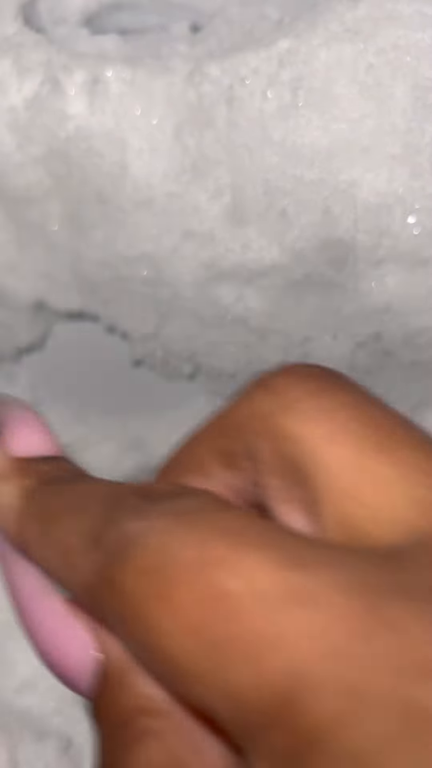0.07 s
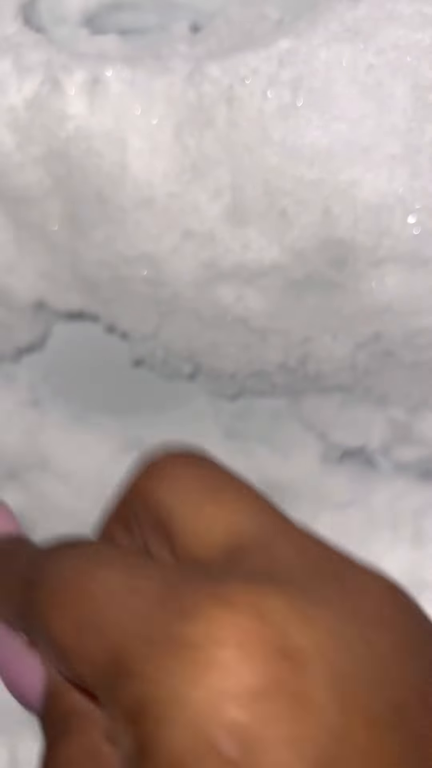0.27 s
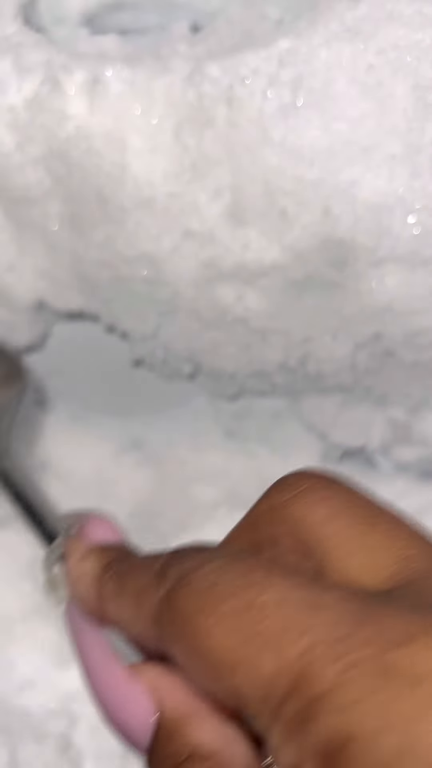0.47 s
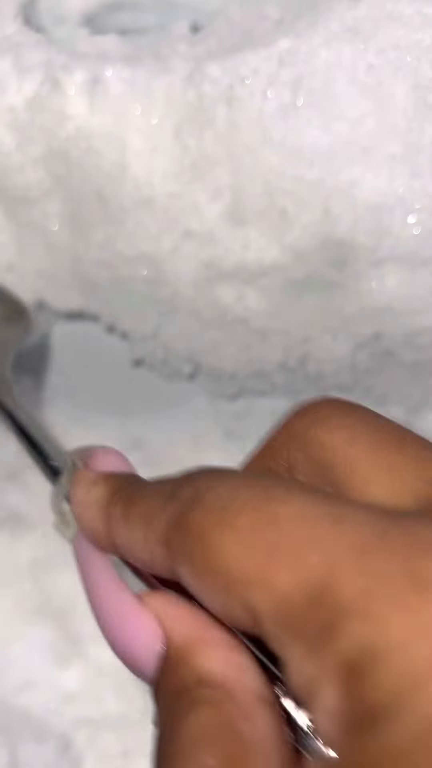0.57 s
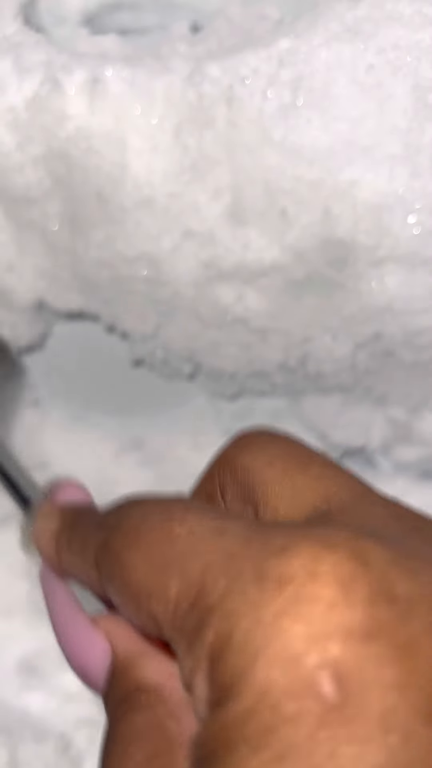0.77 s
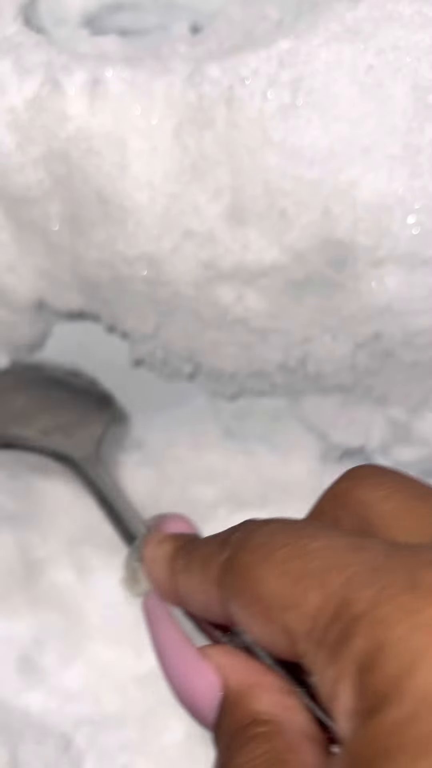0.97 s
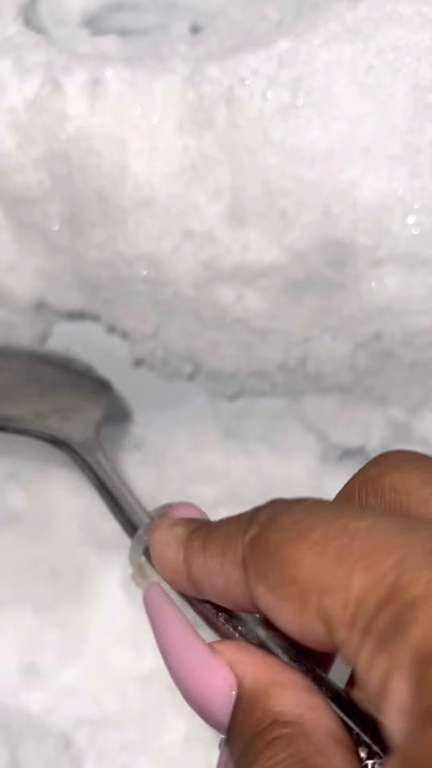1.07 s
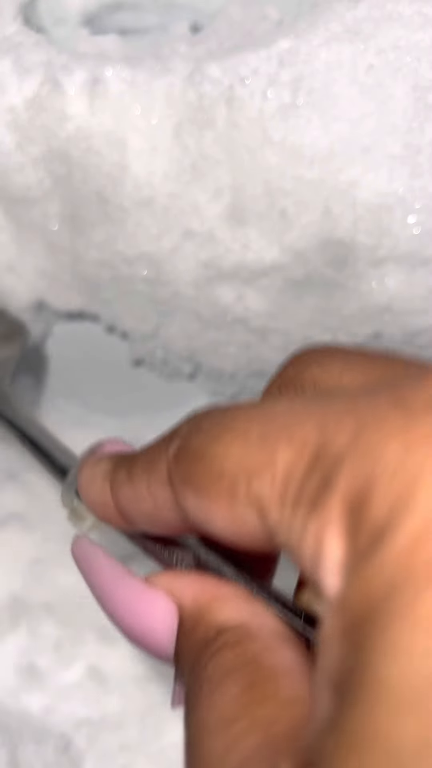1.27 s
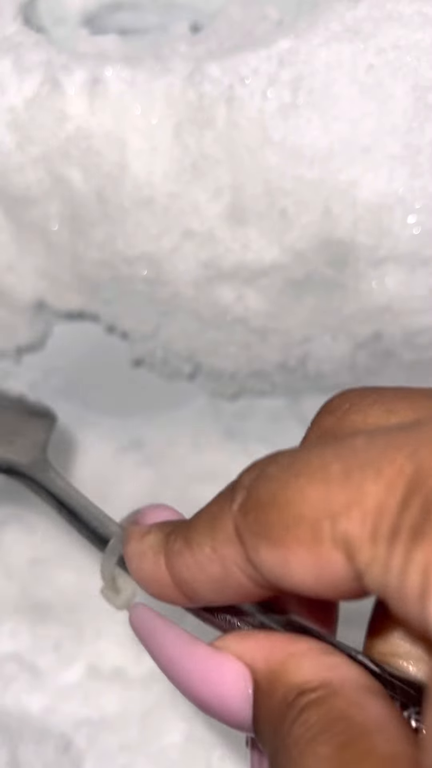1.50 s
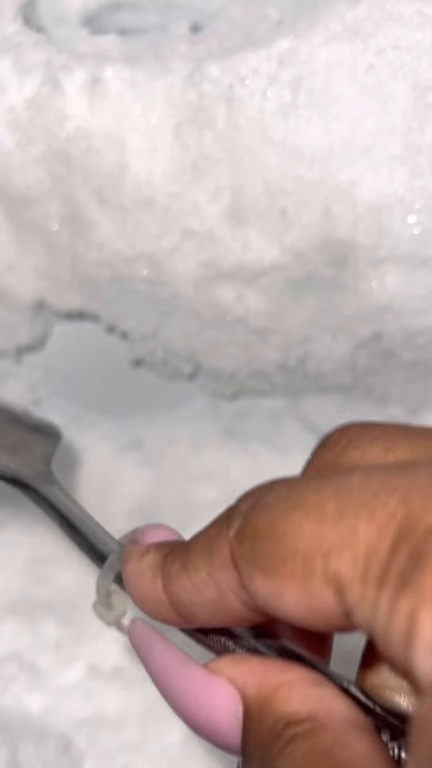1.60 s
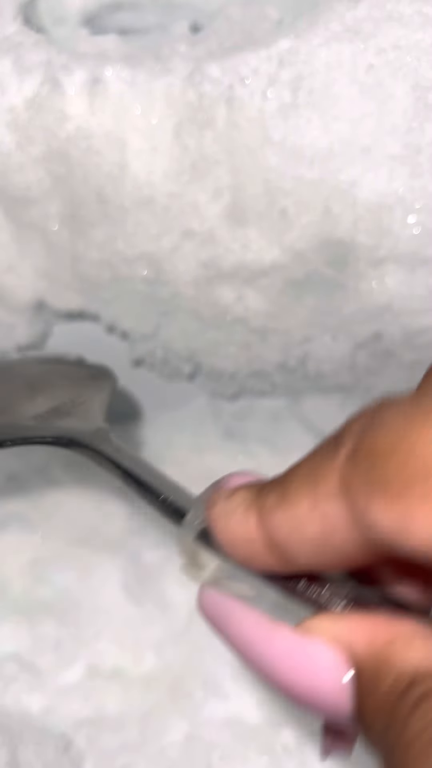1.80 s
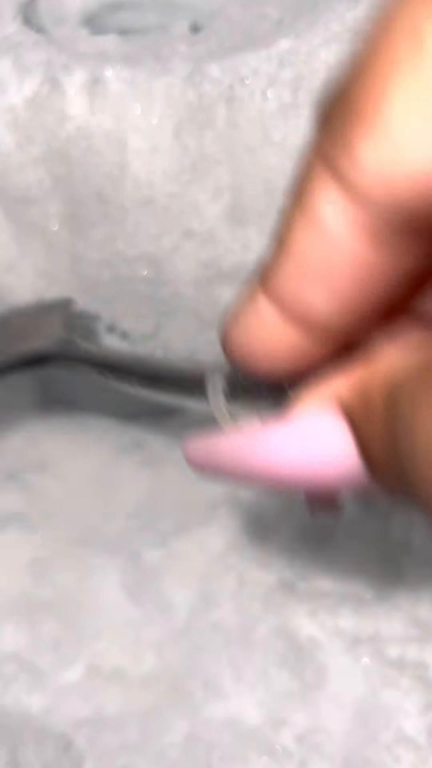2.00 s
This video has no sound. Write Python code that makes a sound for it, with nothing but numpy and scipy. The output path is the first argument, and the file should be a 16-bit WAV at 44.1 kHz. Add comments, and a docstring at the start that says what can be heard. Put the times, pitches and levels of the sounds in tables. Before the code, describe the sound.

A steel spoon scrapes frost in a small freezer, close by. At 0.2 seconds it bites in sharply with a clink, a crunch and a hollow knock. Short, softer scrapes and ticking ice flakes follow until about 1.1 seconds, with another knock near 0.8. After a brief pause, scraping resumes at 1.4 and fades by 1.8, leaving one small tick over a faint room drone.

```python
"""A steel spoon digs and scrapes at the frost inside a small freezer, close by.
Each stroke crushes a swarm of ice crystals, exciting the steel and the hollow compartment.
Flakes snap off with bright ticks. Twice the spoon bites through and the wall knocks hard;
softer blows sound duller. The spoon clinks on hard ice. A quiet room with a faint drone lies behind."""
import sys
import numpy as np
from scipy import signal
from scipy.fft import rfft, irfft, next_fast_len
from scipy.io import wavfile
from scipy.ndimage import map_coordinates

SR = 44100
rng = np.random.default_rng(int(sys.argv[2]) if len(sys.argv) > 2 else 0)


def pcm_store(signal):
    """Save signal as 16-bit PCM."""
    levels = np.round(np.clip(np.atleast_2d(signal), -1, 1) * 32767)
    wavfile.write(sys.argv[1], SR, levels.astype(np.int16).T)


N = 90404

# strokes: t/s, hold/s, base release/(s per 20 dB), hiss/dB, crunch/dB, hollow/dB, steel/dB
FROST_STROKES = [ (.2195, .003, .02, -51, -68, -67, -42), (.2265, .008, .03, -39, -47, -50, -40),
                 (0.269, .015, 0.0008, -44, -54, -53, -51), (0.302, .042, 0.0616, -55, -63, -53, -60),
                 (.398, 0.0134, .06, -56, -68, -58, -65), (.45, .07, .06, -76, -78, -72, -69),
                 (0.543, 0.0221, .03, -60, -65, -60, -64), (0.623, 0.0456, .04, -65, -72, -68, -71),
                 (0.7, 0.0156, .025, -56.5, -63, -60, -61), (0.759, .018, .02, -62, -68, -70, -63),
                 (.786, .024, .1, -50.5, -54.5, -53, -57), (.854, .023, .06, -51, -53.5, -52, -60),
                 (0.888, 0.0154, 0.0686, -64, -65, -52, -68), (0.925, 0.0108, .03, -56, -62, -54, -56),
                 (0.971, 0.0049, .06, -67, -73, -69, -68), (1.009, 0.0059, .07, -60, -65, -65, -67),
                 (1.082, 0.0046, .03, -62, -68, -70, -69), (1.385, .004, .035, -47, -64, -61, -55),
                 (1.397, 0.0143, .1, -53, -64, -55, -63), (1.46, 0.0322, .04, -53.5, -64.5, -54.5, -62),
                 (1.579, .012, 0.0527, -59, -68, -67, -69), (1.622, 0.0138, 0.1553, -67, -72, -71, -74),
                 (1.725, 0.0082, .035, -73, -69, -56, -74), ]
# spoon modes: f/Hz
SPOON_HZ = [5290, 7369, 8424, 9368, 10434, 11183, 11821, 12024, 12420, 13713, 15505]
# spoon modes: t60/s
SPOON_T60_S = [.04, .12, .15, .14, .08, .08, .06, .07, .07, .07, .07]


def scraping():
    """Crystals hiss and crunch under the edge, exciting the steel and the hollow compartment."""
    # crystal hiss: f/Hz, level/dB
    hiss_spectrum = [(1500, -50.5), (3500, -17), (5300, -7), (6400, -8.5), (7500, -4), (10000, -.5),
                     (11500, -1.5), (12400, 1), (13200, -2), (15800, -8)]
    # crunch: f/Hz, level/dB
    crunch_spectrum = [(300, -13), (900, -1), (1350, -1), (1700, 0), (2500, 0.5), (3300, -7), (4500, -17),
                       (8000, -36.5)]
    # compartment: f/Hz, level/dB
    hollow_spectrum = [(100, -17), (200, -9.5), (330, -12), (460, -6), (570, 3), (740, -2), (950, -1.5),
                       (1150, -5), (1400, -19), (2500, -39)]
    hiss_db, crunch_db, hollow_db, steel_db = np.transpose(FROST_STROKES)[3:]
    grains = crystals()
    hiss = pressure(hiss_db, release_scale=.902) * coloured(grains, hiss_spectrum)
    crunch = pressure(crunch_db, release_scale=.985) * coloured(grains, crunch_spectrum)
    steel = pressure(steel_db, release_scale=1) * rubbed_steel()
    hollow = pressure(hollow_db, release_scale=1.346) * coloured(crystals(), hollow_spectrum)
    return hiss + crunch + steel + hollow


def crystals(breaks_per_s=2500, spread_db=3.5, powder_share=.55):
    """Random tiny fractures of uneven size over a smooth powdery rub."""
    breaks = rng.random(N) < breaks_per_s / SR
    size = amp(spread_db * np.minimum(rng.exponential(size=N), 4))
    fractures = unit(breaks * size * rng.choice([-1, 1], N))
    return np.sqrt(1 - powder_share) * fractures + np.sqrt(powder_share) * rng.standard_normal(N)


def pressure(levels_db, release_scale, lead_s=.05):
    """Attack, hold and release of all strokes, summed in power."""
    t, power = np.arange(SR // 3) / SR - lead_s, np.zeros(N)
    for (start_s, hold_s, release_s, *_), db in zip(FROST_STROKES, levels_db):
        attack_s = .008 + .6 * hold_s  # per 20 dB; long strokes start more gently
        rise = np.maximum(-t, 0) / attack_s
        fall = np.maximum(t - hold_s, 0) / (release_s * release_scale)
        add(power, start_s - lead_s, amp(db - 20 * (rise + fall)) ** 2)
    return np.sqrt(power)


def rubbed_steel():
    """Breaking crystals drive the spoon's modes."""
    # excitation per mode: level/dB
    drive_db = [-16, -3, -1, -8, -2, -2, -3, 1, 1, -3, -7]
    widths_hz = np.log(1000) / np.pi / np.array(SPOON_T60_S)
    return unit(filtered(crystals(), lambda f: sum(
        amp(db) * resonance(f, hz, width) for hz, db, width in zip(SPOON_HZ, drive_db, widths_hz))))


def judder(swings_per_s=110, depth_db=1.3):
    """Random gain: the edge catches and slips unevenly."""
    knots = rng.standard_normal(1024)
    return amp(depth_db * map_coordinates(knots, [np.arange(N) * swings_per_s / SR], mode="wrap"))


def snaps(pitched_share=.6):
    """Each flake breaks with a bright tick, coloured by its own pitch."""
    # flakes: t/s, level/dB, t60/s, f/Hz
    flakes = [(.2288, -26, .016, 12000), (.2325, -25, .016, 13660), (.2668, -40, 0.0196, 7960),
              (.2785, -40, 0.0205, 10640), (0.4267, -49, 0.0097, 9540), (.54, -37, .03, 10590),
              (0.5405, -47, .04, 5620), (0.6104, -38, 0.0151, 10860), (0.6165, -37, .022, 12240),
              (0.6817, -36, .014, 11500), (.682, -47, 0.0175, 4420), (.779, -45, .015, 13500),
              (.7845, -40, .018, 11000), (1.3805, -41, 0.014, 8540), (1.3861, -38, 0.0222, 11000),
              (1.413, -43, 0.0085, 12000), (1.4744, -42, 0.0059, 11500), (1.7232, -47, .02, 12200),
              (1.7237, -56, .025, 5500), (1.9141, -41, .004, 11080)]
    # tick: f/Hz, level/dB
    tick_spectrum = [(500, -18), (3000, -14.5), (5000, -6), (9000, -0.5), (16000, 0)]
    out, t = np.zeros(N), np.arange(SR // 10) / SR
    for start_s, db, t60_s, hz in flakes:
        tick = coloured(rng.standard_normal(len(t)), tick_spectrum)
        pitched = unit(filtered(rng.standard_normal(len(t)), lambda f: resonance(f, hz, width_hz=420)))
        snap = np.sqrt(1 - pitched_share) * tick + np.sqrt(pitched_share) * pitched
        add(out, start_s, amp(db) * decay(t, t60_s) * snap)
    return out


def knocks(attack_s=.00085):
    """The wall answers a blow with its modes and a crack of packed frost; soft blows are duller."""
    # frosted wall modes: f/Hz, level/dB, t60/s
    wall_modes = [(166, 1.5, .085), (205, -7, 0.104), (310, -5, .08), (412, -2, .14), (615.6, 0.5, .14),
                  (720, -2, .09), (932.4, -10, 0.108), (1422, -14.5, 0.0335), (1723.4, -8, 0.048),
                  (2123, -9, 0.052), (2291, -6, .07), (2500, -8, .08), (3440, -11, 0.049)]
    # blows: t/s, ring/dB, crack/dB, ring cutoff/Hz
    blows = [(.2312, -42, -37, 5000), (.278, -56, -54, 1500), (.543, -54, -60, 700), (.567, -54, -66, 500),
             (.662, -55, -68, 350), (.708, -57, -67, 350), (.7846, -46, -37, 6000),
             (1.091, -53, -63.5, 300), (1.724, -66, -58, 2000)]
    # packed frost: f/Hz, level/dB
    crack_spectrum = [(70, -28), (135, -3), (350, -5), (700, 1.5), (1100, -10), (2300, 0), (3400, -2),
                      (4300, -12), (9000, -22)]
    out, t = np.zeros(N), np.arange(SR // 6) / SR
    onset = 1 - np.exp(-t / attack_s)
    for start_s, ring_db, crack_db, cutoff_hz in blows:
        modes = [(hz, db - 10 * np.log10(1 + (hz / cutoff_hz) ** 4), t60) for hz, db, t60 in wall_modes]
        crack = coloured(rng.standard_normal(len(t)), crack_spectrum) * decay(t, t60_s=.045)
        add(out, start_s, (amp(ring_db) * ring(modes, t) + amp(crack_db) * crack) * onset)
    return out


def clinks(attack_s=.0004):
    """The hand-damped spoon rings briefly."""
    # hits on hard ice: t/s, level/dB
    hits = [(.229, -39), (0.2324, -33), (.2668, -55)]
    # struck spoon modes: level/dB
    modes_db = [-24, -6, -5, -12, -3, -5, -3, -3, -12, 2, -5]
    out, t = np.zeros(N), np.arange(SR // 6) / SR
    onset = 1 - np.exp(-t / attack_s)
    for start_s, db in hits:
        add(out, start_s, amp(db) * ring(zip(SPOON_HZ, modes_db, SPOON_T60_S), t) * onset)
    return out


def close_walls(x, count=8, level_db=-9):
    """Reflections from the nearby walls comb the sound."""
    delays_s = rng.uniform(.0008, .006, count)
    gains = rng.choice([-1, 1], count) / np.sqrt(count)
    return x + amp(level_db) * sum(g * np.pad(x, (round(d * SR), 0))[:N] for d, g in zip(delays_s, gains))


def echo(x, level_db=-16):
    """Short reverberation of the compartment."""
    t = np.arange(SR // 3) / SR
    tail = rng.standard_normal(len(t)) * decay(t, t60_s=.217) * (t > .002)
    return amp(level_db) * signal.fftconvolve(x, tail / np.linalg.norm(tail))[:N]


def room(noise_db=-60.9):
    """Steady room noise with a faint, unsteady machine drone."""
    # room noise: f/Hz, level/dB
    noise_spectrum = [(20, 0), (40, -9), (90, -9), (150, -17.5), (230, -15), (290, -14), (400, -11.5),
                      (520, -15), (720, -14), (1250, -24), (3000, -28), (6000, -32.5), (10000, -33),
                      (16000, -36.5)]
    # drone: f/Hz, level/dB
    drone_tones = [(27, -72), (65, -73.5), (237, -78.5)]
    drone = np.zeros(N)
    for hz, db in drone_tones:
        band = filtered(rng.standard_normal(N), lambda f: resonance(f, hz, width_hz=6.3) ** 2)
        drone += amp(db) * unit(band)
    return amp(noise_db) * coloured(rng.standard_normal(N), noise_spectrum) + drone


def amp(db):
    """Decibels to gain."""
    return 10 ** (np.asarray(db) / 20)


def unit(x):
    """Scale to rms 1."""
    return x / np.sqrt(np.mean(x ** 2) + 1e-20)


def filtered(x, response):
    """Apply a frequency response."""
    size = next_fast_len(len(x) + 8192)
    return irfft(rfft(x, size) * response(np.fft.rfftfreq(size, 1 / SR)), size)[:len(x)]


def coloured(x, points):
    """Shape by (f/Hz, level/dB) points, at rms 1."""
    f, db = np.transpose(points)
    return unit(filtered(x, lambda hz: amp(np.interp(np.log(hz + 1), np.log(f + 1), db))))


def resonance(f, hz, width_hz):
    """Response of one resonance."""
    return 1j * f * width_hz / (hz * hz - f * f + 1j * f * width_hz)


def decay(t, t60_s):
    """Fall of 60 dB in t60_s."""
    return np.exp(-np.log(1000) * t / t60_s)


def ring(modes, t):
    """Damped modes of alternating sign, struck a little differently each time."""
    return sum((-1) ** k * amp(db + rng.normal(0, 1)) * decay(t, t60_s) * np.sin(2 * np.pi * hz * t)
               for k, (hz, db, t60_s) in enumerate(modes))


def add(track, start_s, sound):
    """Mix a sound into the track."""
    part = track[round(start_s * SR):][:len(sound)]
    part += sound[:len(part)]


def scene():
    """Spoon and frost, their echo and the room."""
    spoon = close_walls(scraping() * judder()) + snaps() + clinks() + knocks()
    return (spoon + echo(spoon) + room())[None]


def record(dry):
    """Brick-wall low-pass."""
    top_hz = 15850
    return np.array([filtered(x, lambda hz: hz < top_hz) for x in dry])


dry = scene()
out = record(dry)
pcm_store(out)
```